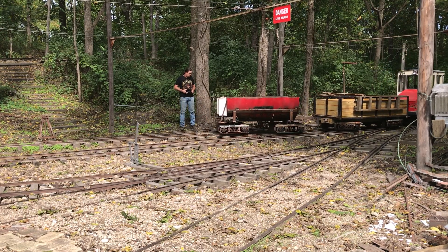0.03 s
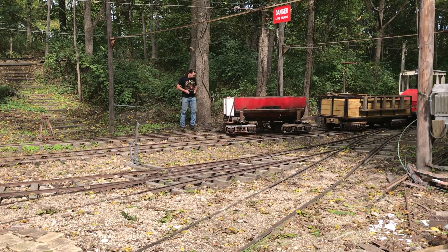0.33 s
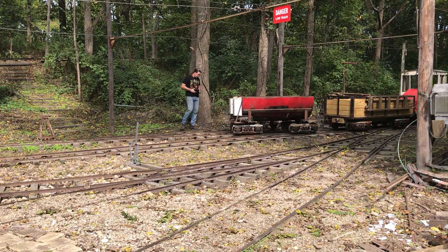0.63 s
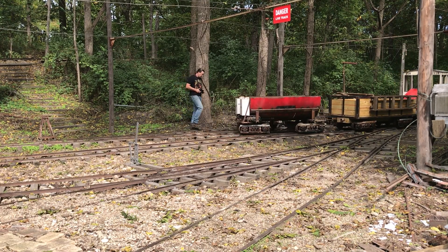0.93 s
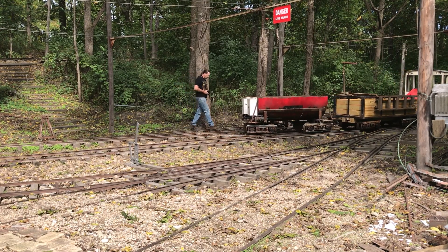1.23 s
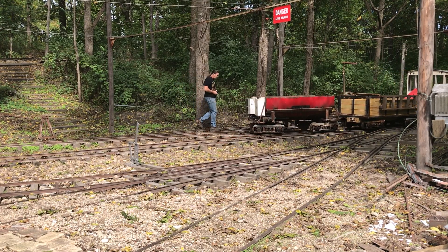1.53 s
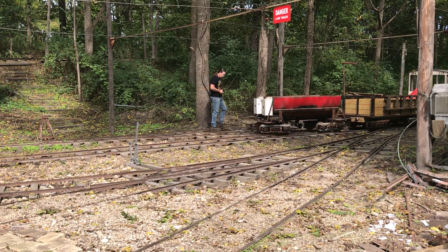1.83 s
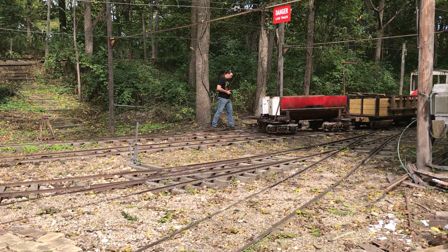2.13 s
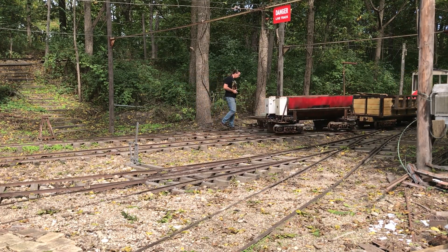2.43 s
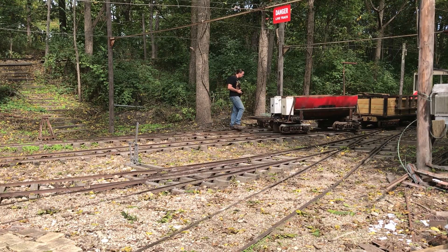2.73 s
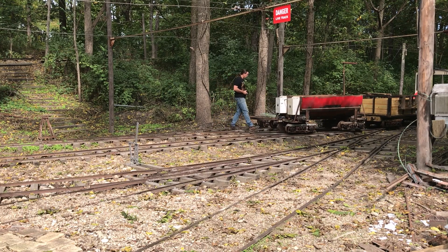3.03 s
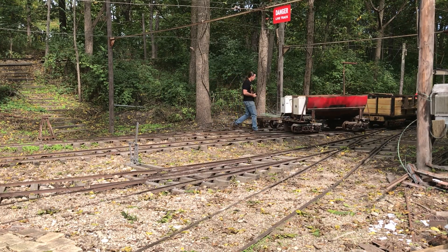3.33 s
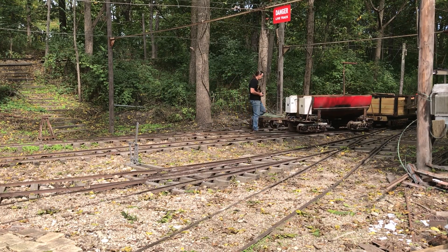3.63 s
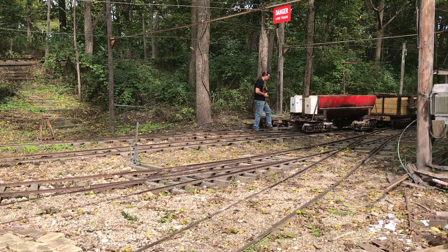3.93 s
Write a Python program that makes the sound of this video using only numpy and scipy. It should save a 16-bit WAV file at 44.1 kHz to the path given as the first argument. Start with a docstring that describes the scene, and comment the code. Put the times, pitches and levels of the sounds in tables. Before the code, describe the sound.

Small rail cars roll slowly away some way off, rumbling and grinding as loose gear knocks. The couplings clank hard early on, and the buffers clank near the end. Crickets trill throughout in the wooded yard.

```python
"""Crickets trill in a wooded yard while, some way off, small narrow-gauge cars roll slowly away.
From the start the wheels grind, the bodies rumble and boom on uneven track, and loose gear knocks.
At 0.7 s the couplings clank hard and a steel pin rings. A nearer cricket joins in at 1.1 s
and again at 2.9 s. At 3.6 s the buffers butt together in a second clank.
The trees answer each knock and clank with a short echo."""
import sys
import numpy as np
from scipy import signal
from scipy.fft import rfft, irfft
from scipy.io import wavfile
from scipy.ndimage import uniform_filter1d

SR = 44100
rng = np.random.default_rng(int(sys.argv[2]) if len(sys.argv) > 2 else 0)


def master(y):
    """Save y as 16-bit WAV."""
    cut = np.clip(np.atleast_2d(y).T, -1, 1)
    pcm = np.round(cut * 32767)  # scale
    wavfile.write(sys.argv[1], SR, pcm.astype(np.int16))


N = 176400  # 4 seconds

# How the rumble and the wheel drone rise and fall: time_s, relative_level_db
RUMBLE_LEVEL = [(0.0, -36), (3.97, -41), (4.0, -31)]
WHEEL_LEVEL = [(0, -43.5), (.35, -42.5), (.45, -39.5), (.8, -39), (1.07, -43.5), (1.25, -38.5),
               (1.45, -42.5), (1.56, -37), (1.65, -41), (2.05, -43), (2.33, -37.5), (2.55, -43),
               (2.75, -47.5), (3.05, -45.5), (3.3, -41.5), (3.43, -47), (3.67, -33.5), (3.77, -42.5),
               (4, -41.5)]
# Their tone, or how strong each pitch is: pitch_hz, strength_db
RUMBLE_TONE = [(20, -64), (40, -32.5), (60, -9.5), (85, -2), (107, -0.5), (128, -8.5), (165, -22),
               (300, -75.5)]
WHEEL_TONE = [(80, -44), (150, 0.5), (185, 1.5), (245, 5), (315, -1), (365, -8.5), (420, -7), (600, -15),
              (1000, -23), (3000, -83)]
RUMBLE_DB, WHEELS_DB = -1.5, -1

def rolling():
    """The rolling cars rumble low and their wheels drone."""
    rumble = colour(rng.standard_normal(N), RUMBLE_TONE) * level(RUMBLE_LEVEL)
    wheels = colour(rng.standard_normal(N), WHEEL_TONE) * level(WHEEL_LEVEL)
    return gain(RUMBLE_DB) * rumble + gain(WHEELS_DB) * wheels


# A wheel drops on uneven track: start_s, level_db
BOOMS = [(.145, -32), (0.404, -30), (0.751, -30), (0.996, -29), (1.168, -32.5), (1.345, -27.5),
         (1.577, -25.5), (1.713, -28), (1.947, -28.5), (2.106, -27.5), (2.194, -29), (2.302, -27),
         (2.425, -29), (2.95, -38), (3.35, -38.5), (3.633, -27), (3.817, -26.5), (3.963, -33)]
BOOM_HZ, BOOM_RISE_S, BOOM_SCATTER = 105.9, 0.015, 0.069

def booms():
    """Each jolt makes the lowest note of a car body swell and die away."""
    out, t = np.zeros(N), np.arange(SR // 4) / SR
    swell = (t / BOOM_RISE_S * np.exp(1 - t / BOOM_RISE_S)) ** 1.18
    for start_s, level_db in BOOMS:
        hz = BOOM_HZ * (1 + BOOM_SCATTER * rng.standard_normal())
        add(out, start_s, gain(level_db) * swell * np.sin(2 * np.pi * (hz * t + rng.random())))
    return out


# Blows of the couplings: start_s, level_db, hollow_db, crack_top_hz
COUPLING_HITS = [(.692, -38.5, -15, 3300), (.704, -29, -20, 2900), (.714, -28.5, -14, 3400),
                 (.724, -29, -2, 6000), (.740, -30, -2, 5500)]
# The notes of a steel frame: pitch_hz
FRAME_HZ = [958, 1090, 1404, 1606, 1770, 1878, 2121, 2271, 2800, 3466, 3632]
# How each of them rings: strength_db, ring_s
FRAME_RINGS = [(-11.5, 0.17), (-20, 0.13), (-8, 0.11), (-8, 0.13), (-9, 0.044), (-13.5, 0.1), (-11, 0.072),
               (-8, 0.095), (-20, 0.077), (-7.5, 0.091), (-11, 0.078)]

def couplings():
    """The couplings run in and shake the steel frames."""
    return clank(COUPLING_HITS, FRAME_HZ, FRAME_RINGS)


# Blows of the buffers: start_s, level_db, hollow_db, crack_top_hz
BUFFER_HITS = [(3.610, -36.5, -10, 3500), (3.618, -31.5, -6, 6000), (3.625, -29.5, -2, 3800)]
# The notes of a buffer: pitch_hz
BUFFER_HZ = [1130, 1660, 2600, 3289, 4260]
# How each of them rings: strength_db, ring_s
BUFFER_RINGS = [(-3, .12), (5, .045), (-3, .085), (-4, .06), (-10, .06)]

def buffers():
    """The buffers, the bumpers between cars, butt together and ring briefly."""
    return clank(BUFFER_HITS, BUFFER_HZ, BUFFER_RINGS)


CLANK_BOTTOM_HZ, CLANK_BLOW_DB = 750, -2

def clank(hits, pitches, rings):
    """Heavy iron meets in quick blows; each one cracks and sets the struck part ringing."""
    out = np.zeros(N)
    for start_s, level_db, hollow_db, crack_top_hz in hits:
        def band_db(hz):
            """Keeps the pitches between the bottom and the top of the crack."""
            return -10 * np.log10((1 + (hz / crack_top_hz) ** 8) * (1 + (CLANK_BOTTOM_HZ / hz) ** 8))
        add(out, start_s - BUILD_S, gain(level_db + CLANK_BLOW_DB) * blow(band_db, hollow_db))
        add(out, start_s, gain(level_db) * steel_ring(pitches, rings))
    return out


# Blows on the coupling pin: start_s, level_db
PIN_HITS = [(.729, -31.5), (.741, -34), (.77, -43)]
# The notes of the pin: pitch_hz
PIN_HZ = [3650, 5078, 8700, 10540, 10760, 15410]
# How each of them rings: strength_db, ring_s
PIN_RINGS = [(-2, .07), (-12, .16), (-12, .2), (-12, .13), (1, .032), (-19, .15)]

def pin():
    """A steel coupling pin rings brightly, chattering in its hole."""
    out = np.zeros(N)
    for start_s, level_db in PIN_HITS:
        add(out, start_s, gain(level_db) * steel_ring(PIN_HZ, PIN_RINGS, chatter_db=4))
    return out


# Knocks of loose gear: start_s, level_db, hollow_db, pitch_hz
KNOCKS = [(.053, -46, -15, 2720), (.155, -43, -3, 1430), (.185, -43, 7.5, 1197), (0.443, -45, 11, 1090),
          (0.643, -43, 4, 2270), (0.663, -38.5, 1, 2370), (0.791, -41.5, 1, 3040), (.945, -49, -20, 3600),
          (1.202, -48, 9, 2580), (1.245, -46.5, 7.5, 1930), (1.418, -47.5, 5.5, 1950),
          (1.523, -42.5, 5, 1750), (1.558, -43.5, -10, 2440), (1.582, -45, -11, 2220),
          (1.687, -45, 4.5, 870), (1.921, -44, 6, 1284), (2.212, -43, 0.5, 3250), (2.309, -42, 6, 2760),
          (2.334, -49, -6, 2160), (2.436, -50, 5, 4170), (2.495, -47.5, 9, 1350), (2.637, -48, 8.5, 850),
          (3.075, -45.5, -13, 2410), (3.092, -47, 4, 2720), (3.297, -50, 6, 2210), (3.575, -43.5, -3, 1680),
          (3.657, -44, 6, 3070), (3.685, -43, -2, 1300), (3.817, -43, 4, 1380)]
CRACK_PEAK_DB, HARD_KNOCK_DB, TREBLE_TILT = 7.5, -41, 0.52
FRAME_DB, PING_DB, PING_RING_S = -6.5, -1, 0.07

def knocks():
    """Loose gear hits with a crack and a short ping, and the frame rings faintly."""
    out = np.zeros(N)
    for start_s, level_db, hollow_db, pitch_hz in KNOCKS:
        def hump_db(hz):
            """Strongest near the knock's pitch; harder knocks are brighter."""
            octaves = np.log2(hz / pitch_hz)
            treble_db = TREBLE_TILT * (level_db - HARD_KNOCK_DB) * np.maximum(octaves, 0)
            return CRACK_PEAK_DB * np.exp(-.5 * octaves ** 2) + treble_db
        add(out, start_s - BUILD_S, gain(level_db) * blow(hump_db, hollow_db))
        frame = gain(FRAME_DB) * steel_ring(FRAME_HZ, FRAME_RINGS)
        ping = steel_ring([pitch_hz], [(PING_DB, PING_RING_S)])
        add(out, start_s, gain(level_db) * (frame + ping))
    return out


# Tone of a blow's sharp crack and of its hollow thud: pitch_hz, strength_db
CRACK_TONE = [(200, -33), (500, -4.5), (1050, 2.5), (1650, 1), (2400, -2), (3500, -1.5), (5000, -4.5),
              (8000, -8), (16000, -31)]
HOLLOW_TONE = [(70, -14), (160, -8.5), (250, 7), (330, 2), (500, -2.5), (900, -7), (3000, -37.5)]
CRACK_FADE_S, HOLLOW_RISE_S, HOLLOW_FADE_S, TONE_SCATTER_DB = 0.019, 0.0071, 0.027, 3.8

def blow(shape_db, hollow_db):
    """A rough crack, then the hollow thud of the car body. The hit comes BUILD_S into the sound."""
    t = np.arange(8192) / SR - BUILD_S
    hz = np.fft.rfftfreq(len(t), 1 / SR) + 1
    chatter = rng.standard_normal(len(t)) * gain(0.79 * drift(len(t), points=130))
    crack = colour(chatter, CRACK_TONE, shape_db(hz) + TONE_SCATTER_DB * drift(len(hz), points=260))
    thud = colour(rng.standard_normal(len(t)), HOLLOW_TONE)
    thud *= np.clip(t / HOLLOW_RISE_S, 0, 1) * np.exp(-t / HOLLOW_FADE_S)
    return crack * rattle(t, CRACK_FADE_S) + gain(hollow_db) * thud


BUILD_S, ATTACK_S = 0.012, 0.0024

def rattle(t, fade_s):
    """Loose parts meet one after another: the level builds until just after t = 0, then fades."""
    build = np.clip((t + BUILD_S - ATTACK_S) / BUILD_S, 0, 1) ** 2
    return build * np.exp(-np.maximum(t - ATTACK_S, 0) / fade_s)


def steel_ring(pitches, rings, chatter_db=0):
    """Struck steel sounds its own notes, each falling 60 dB in ring_s. Chatter makes them rough."""
    t = np.arange(SR // 2) / SR
    out = np.zeros(len(t))
    for hz, (strength_db, ring_s) in zip(pitches, rings):
        strength = gain(strength_db + chatter_db * drift(len(t), points=110))
        note = np.sin(2 * np.pi * hz * t + rng.uniform(0, 2 * np.pi))
        out += strength * note * gain(-60 * t / ring_s)
    return out * np.minimum(t / ATTACK_S, 1)


# Clinks of chain links and hooks: start_s, level_db, pitch_hz
CLINKS = [(.15, -39.5, 1620), (.99, -44, 1700), (1.2, -44, 2850), (1.47, -45, 3480), (1.553, -46, 3450),
          (1.755, -43, 790), (1.797, -45, 2050), (1.922, -41, 1330), (3.522, -43.5, 1350),
          (3.574, -42, 1650)]
CLINK_FADE_S, CLINK_WIDTH_OCTAVES = 0.011, 0.045

def clinks():
    """Small loose links chatter briefly, each on one note."""
    out, t = np.zeros(N), np.arange(SR // 10) / SR
    hz = np.fft.rfftfreq(len(t), 1 / SR) + 1
    for start_s, level_db, pitch_hz in CLINKS:
        peak_db = -(np.log2(hz / pitch_hz) / CLINK_WIDTH_OCTAVES) ** 2
        note = colour(rng.standard_normal(len(t)), CRACK_TONE, peak_db)
        add(out, start_s - BUILD_S, gain(level_db) * note * rattle(t - BUILD_S, CLINK_FADE_S))
    return out


# Scrapes of bare steel: start_s, level_db
SCRAPES = [(0.722, -40), (.732, -38.5), (.743, -37.5), (.772, -46), (0.898, -54), (1.42, -55), (3.620, -50),
           (3.645, -52), (3.842, -54)]
# Their bright tone: pitch_hz, strength_db
SCRAPE_TONE = [(2000, -14), (4000, -6), (8700, 6), (11500, 3.5), (14000, -7), (16000, -19)]

def scrapes():
    """Steel slides on steel with a short, gritty hiss."""
    out, t = np.zeros(N), np.arange(SR // 4) / SR
    for start_s, level_db in SCRAPES:
        grains = rng.standard_normal(len(t)) * gain(6.8 * drift(len(t), points=120))
        hiss = colour(grains, SCRAPE_TONE, TONE_SCATTER_DB * drift(len(t) // 2 + 1, points=80))
        add(out, start_s - BUILD_S, gain(level_db) * hiss * rattle(t - BUILD_S, fade_s=0.013))
    return out


# How the grinding on the rails rises and falls: time_s, level_db
GRIND_LEVEL = [(0, -49), (.25, -55), (.47, -47.5), (.57, -52.5), (.85, -46), (1.1, -50.5), (2.05, -51),
               (2.35, -49), (2.8, -56), (3.4, -54.5), (4, -53)]
# Its tone: pitch_hz, strength_db
GRIND_TONE = [(300, 3.5), (700, 2.5), (1300, 4.5), (1800, -3), (2200, -3.5), (3600, -7), (4500, -7.5),
              (5300, -13.5), (10000, -21.5)]
GRIT_PER_S, GRIT_SPREAD_DB, GRIT_SHARE = 500, 1.5, 0.52
PATCH_DB, FLICKER_DB, GRIND_RING_DB = 2.2, 1.8, -10.5

def grinding():
    """Wheels crush rust and grit and keep the frames faintly ringing."""
    grit = rng.choice([-1, 1], N) * (rng.random(N) < GRIT_PER_S / SR)
    grit = grit * gain(GRIT_SPREAD_DB * np.minimum(rng.exponential(1, N), 3))
    crunch = GRIT_SHARE * unit(grit) + (1 - GRIT_SHARE) * rng.standard_normal(N)
    # Small patches of pitch and time get louder or softer by chance.
    bands = signal.stft(crunch, nperseg=1024)[2]
    patches = uniform_filter1d(rng.standard_normal(bands.shape), size=5, axis=0)
    patches = unit(uniform_filter1d(patches, size=3, axis=1))
    patchy = signal.istft(bands * gain(PATCH_DB * patches))[1][:N]
    grind = colour(patchy * gain(FLICKER_DB * drift(N, points=220)), GRIND_TONE)
    frame = unit(signal.fftconvolve(grind, steel_ring(FRAME_HZ, FRAME_RINGS))[:N])
    return (grind + gain(GRIND_RING_DB) * frame) * level(GRIND_LEVEL)


# The nearer cricket's trills: start_s, length_s, level_db
TRILLS = [(1.098, .6, -54), (2.929, .635, -54)]
TRILL_HZ, TRILL_RISE_S, TRILL_ECHO = 7240, 0.13, 0.25

def near_cricket():
    """One cricket swells into each trill, with a little echo from the trees."""
    out = np.zeros(N)
    for start_s, length_s, level_db in TRILLS:
        t = np.arange(0, length_s, 1 / SR)
        swell = np.sqrt(np.minimum(t / TRILL_RISE_S, 1))
        trill = wing_strokes(len(t), TRILL_HZ, pulses_per_s=31.6, fall_hz=176, unevenness=.004)
        add(out, start_s, gain(level_db) * swell * trill)
    return out + TRILL_ECHO * tree_echo(out)


def wing_strokes(size, hz, pulses_per_s, fall_hz, unevenness):
    """A cricket rubs its wings: each stroke is a short note that falls in pitch."""
    stroke = np.cumsum(pulses_per_s * (1 + unevenness * drift(size, points=25))) / SR % 1
    progress = np.clip((stroke - .5) / .6, -.5, .5)  # sounds for 60% of each stroke
    pitch = hz - fall_hz * progress + 35 * drift(size, points=150)
    return unit(np.cos(np.pi * progress) * sine(pitch))


# The crickets all around, one a row: pitch_hz, level_db, pulses_per_s
CHORUS = [(6455, -59, 36), (6920, -59.5, 33.5), (6760, -56.5, 30.4), (6984, -53.5, 28.5)]
CHORUS_ECHO = 0.73

def cricket_chorus():
    """Several crickets trill without a break, blurred by the trees."""
    song = sum(gain(db) * wing_strokes(N + SR, hz, pulses_per_s, fall_hz=244, unevenness=.02)
               for hz, db, pulses_per_s in CHORUS)
    blurred = np.sqrt(1 - CHORUS_ECHO ** 2) * song + CHORUS_ECHO * tree_echo(song)
    return blurred[SR:]  # skip a second so the echo has built up


# Tone of the far crickets: pitch_hz, strength_db
FAR_CRICKET_TONE = [(5200, -45), (5850, -11), (6150, -3), (6450, 4), (6950, -4), (7200, -0.5), (7450, -6.5),
                    (7900, -22), (9000, -62)]
FAR_DB = -55

def far_crickets():
    """Far crickets merge into a high hiss."""
    return gain(FAR_DB) * colour(rng.standard_normal(N), FAR_CRICKET_TONE)


WHINE_HZ, WHINE_DB = 3755, -67.5

def whine():
    """A thin, slightly wavering whine that swells by 5 dB over the first 2 s."""
    note = sine(WHINE_HZ + 8 * drift(N, points=300))
    waver = gain(1.2 * drift(N, points=60))
    return gain(WHINE_DB) * level([(0, -5), (2, 0)]) * unit(note * waver)


# How long the echo takes to fall 60 dB: pitch_hz, ring_s
ECHO_TIMES = [(100, 0.43), (1000, 0.51), (4000, 0.31), (14000, 0.21)]
ECHO_DB = -11.5

def tree_echo(sound):
    """Trunks and ground scatter the sound back; the highest pitches die first."""
    bounces = rng.standard_normal(SR) * (rng.random(SR) < 2000 / SR)
    bounces[:301] = 0  # a gap of about 7 ms before the first bounce
    hz, t, bands = signal.stft(bounces, SR, nperseg=256)
    fade = gain(-60 * t / look_up(ECHO_TIMES, hz)[:, None])
    tail = signal.istft(bands * fade, SR, nperseg=256)[1]
    return signal.fftconvolve(sound, tail / np.linalg.norm(tail))[:len(sound)]


# Tone of the woods: pitch_hz, strength_db
WOODS_TONE = [(100, 26.5), (1000, 18), (4000, 5), (5200, -10), (8300, 12.5), (9400, 8), (10400, -7),
              (11200, 0), (13800, 1), (15700, -29)]
WOODS_DB = -60.5

def woods():
    """The faint, steady hiss of the woods."""
    return gain(WOODS_DB) * colour(rng.standard_normal(N), WOODS_TONE)


def gain(db):
    """Turns decibels into a number to multiply by."""
    return 10 ** (np.asarray(db) / 20)


def unit(sound):
    """Scales a sound to an average size (rms) of 1."""
    return sound / np.sqrt(np.mean(sound ** 2) + 1e-20)


def sine(pitch_hz):
    """A pure note that follows a changing pitch."""
    return np.sin(2 * np.pi * np.cumsum(pitch_hz) / SR)


def look_up(table, hz):
    """Reads between a table's rows, giving each octave equal room."""
    pitches, values = np.transpose(table)
    return np.interp(np.log(hz + 1), np.log(pitches + 1), values)


def level(table):
    """Joins rows of time_s, level_db into a volume curve."""
    return gain(np.interp(np.arange(N) / SR, *np.transpose(table)))


def add(mix, start_s, sound):
    """Mixes a sound in at its start time."""
    part = mix[max(round(start_s * SR), 0):][:len(sound)]
    part += sound[:len(part)]


def drift(size, points):
    """A wandering line through evenly spaced random points."""
    return np.interp(np.linspace(0, points - 1, size), np.arange(points), rng.standard_normal(points))


def colour(sound, tone, extra_db=0):
    """Turns each pitch up or down by a tone table, then scales to an average size of 1."""
    hz = np.fft.rfftfreq(len(sound), 1 / SR)
    return unit(irfft(rfft(sound) * gain(look_up(tone, hz) + extra_db), len(sound)))


def scene():
    """The train, its echo, the crickets and the woods, in one channel."""
    hits = knocks() + clinks() + couplings() + buffers() + scrapes() + pin()
    train = rolling() + grinding() + booms() + hits + gain(ECHO_DB) * tree_echo(hits)
    background = near_cricket() + cricket_chorus() + far_crickets() + whine() + woods()
    return (train + background)[None]


TREBLE_LIMIT_HZ = 15750

def record(dry):
    """Cuts off the very highest treble."""
    treble_cut = signal.firwin(511, TREBLE_LIMIT_HZ, window=("kaiser", 9), fs=SR)
    return signal.oaconvolve(dry, treble_cut[None], "same")


dry = scene()
out = record(dry)
master(out)
```